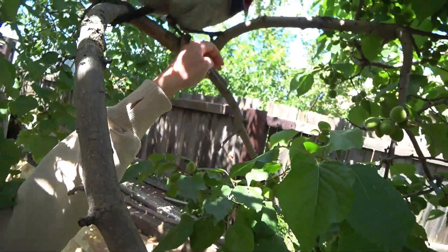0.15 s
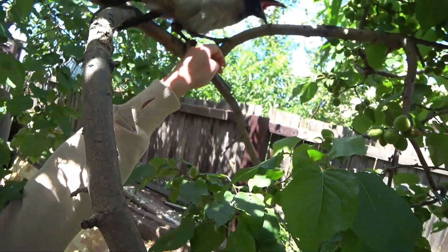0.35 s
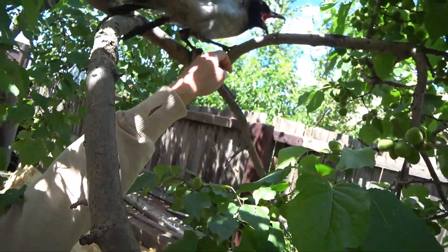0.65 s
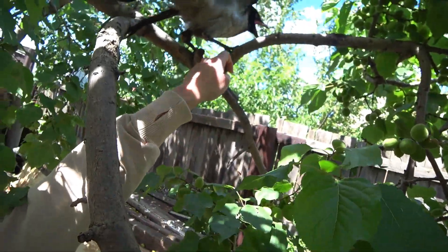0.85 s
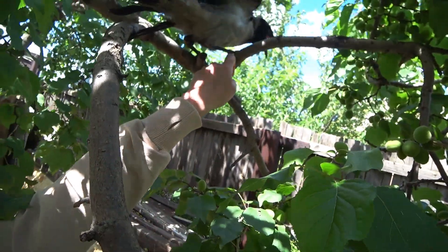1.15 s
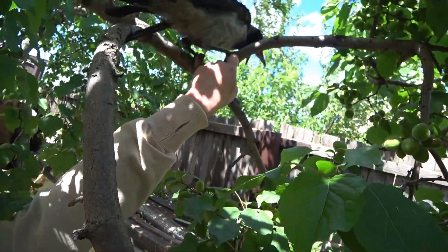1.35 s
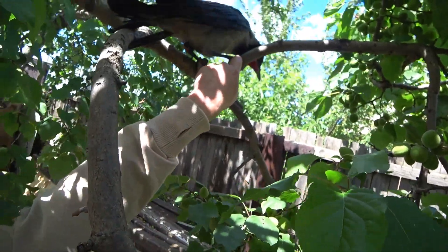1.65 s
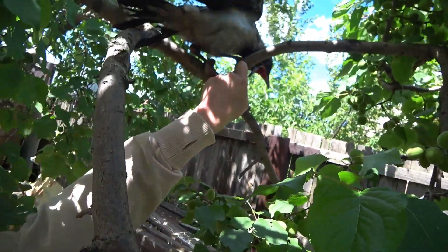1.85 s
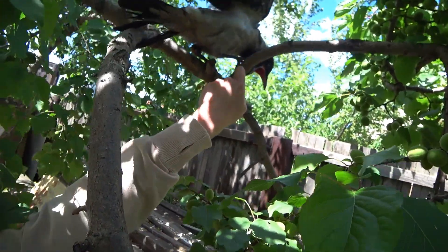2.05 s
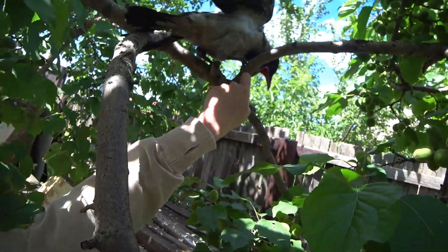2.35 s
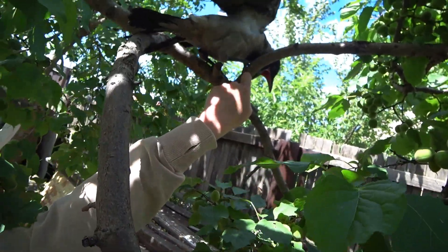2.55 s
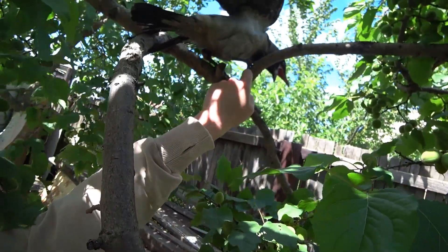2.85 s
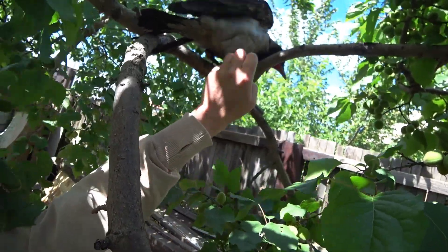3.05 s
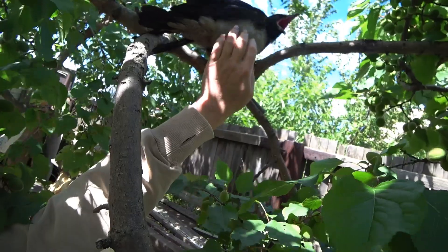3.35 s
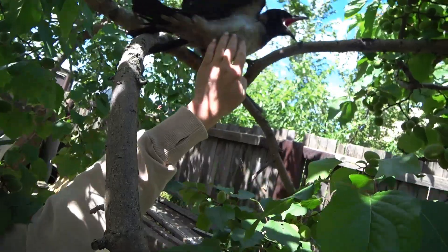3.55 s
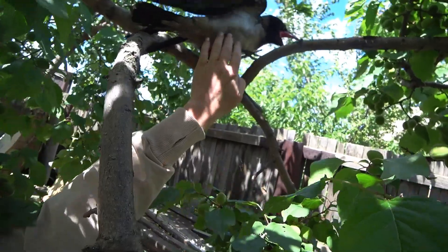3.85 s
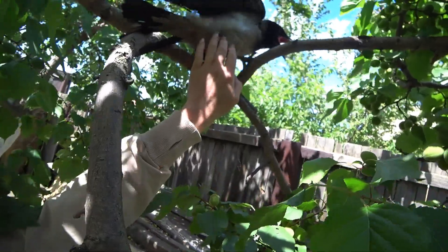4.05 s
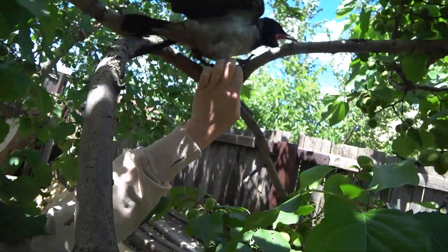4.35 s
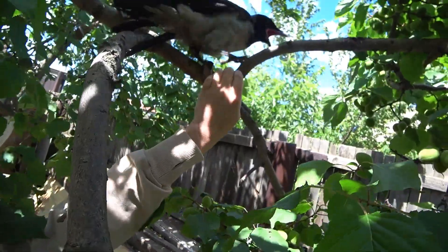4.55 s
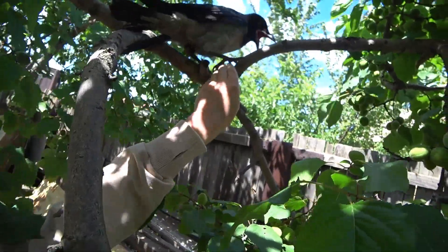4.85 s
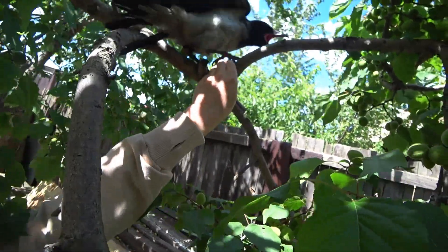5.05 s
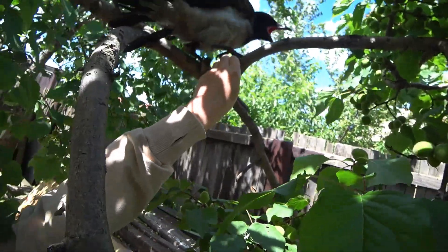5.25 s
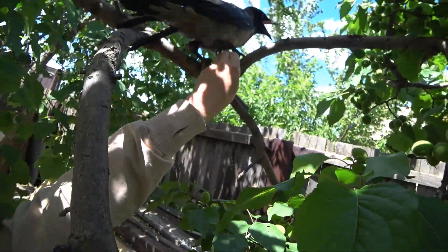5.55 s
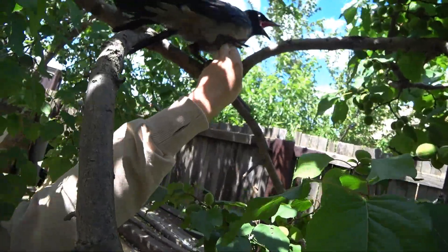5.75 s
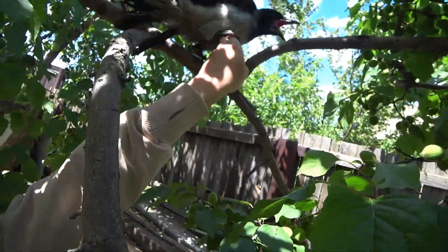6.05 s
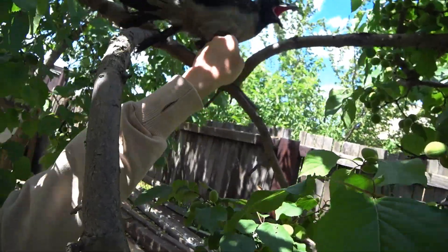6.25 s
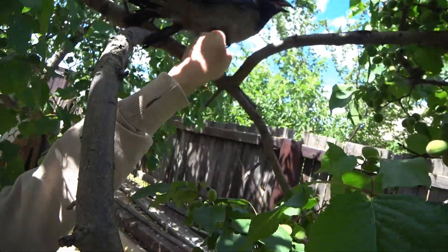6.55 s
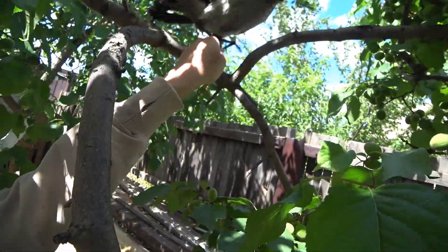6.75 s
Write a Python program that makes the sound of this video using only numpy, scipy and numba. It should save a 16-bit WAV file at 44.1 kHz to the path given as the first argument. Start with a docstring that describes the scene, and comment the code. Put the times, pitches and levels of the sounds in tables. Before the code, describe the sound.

A young crow caws eight times, close to the microphone and a little to the right, the short, raspy calls coming just under a second apart. Many brighten as the beak opens wider. Behind them is only the faint hush of a yard and distant town. Small claw ticks on a branch, light leaf rustles and a few soft low puffs on the microphone occur, mainly early on and after the final call.

```python
"""In a quiet leafy yard, a young crow begs eight times from a branch just above the microphone.
The two sides of its voice box snap at different rates, one about three quarters of the other,
and pull on each other, making the caw harsh.
Its throat rings with each snap, and the ringing tones mostly rise as the beak opens wider.
Leaves brush, claws tick on bark and air bumps the microphone, over a faint outdoor hush."""
import sys
import numpy as np
from scipy import signal
from scipy.fft import rfft, irfft
from scipy.io import wavfile
from scipy.ndimage import uniform_filter1d, minimum_filter1d
from numba import njit

SR = 44100
rng = np.random.default_rng(int(sys.argv[2]) if len(sys.argv) > 2 else 0)


def output_pcm(signal):
    """Save a mono or channel-first signal as 16-bit PCM at the path in sys.argv[1].

    Samples are clipped to [-1, 1] before scaling.
    """
    pcm = np.clip(np.atleast_2d(signal).T, -1, 1) * 32767
    wavfile.write(sys.argv[1], SR, np.round(pcm).astype(np.int16))


N = 304528
TIME = np.arange(N) / SR
YARD_FADE_S = .55  # time for the yard's echo to fall by 60 dB

# One caw per row. A pair holds the values before and after the beak opens wider.
# (start [s], end [s], attack [s], base pitch [Hz], pitch sag [share/s], time to half open [s],
# further time to fully open [s], level pair [dB], first, second and third throat tone pairs [Hz],
# brightness pair [dB], second tone gain [dB], top tone gain [dB])
CAW_SHAPES = [ (0.232, 0.625, 0.0042, 420.4, 0.18, .15, 0.081, -13, -5.5, 1980, 2130, 4270, 4680, 6870, 6550, 6, 2, -11.5, -7),
              (1.026, 1.422, 0.018, 409.6, .13, 0.19, 0.1, -6.5, -9, 1940, 2255, 3650, 5550, 6300, 6940, -2, 2.5, -10.5, -8),
              (1.835, 2.294, 0.0025, 404.6, 0.029, 0.17, 0.17, -9, -8.5, 2035, 2055, 4170, 4420, 6760, 6940, 1, 5.5, -11, 0.5),
              (2.636, 3.022, .009, 405.3, .01, .26, 0.13, -7.5, -7, 2000, 2110, 3680, 4420, 6450, 6400, -0.5, 4, -10, -1.5),
              (3.408, 3.825, 0.0042, 409.3, 0.068, 0.2, .09, -11, -5.5, 2040, 2010, 3840, 4300, 6400, 6370, 2, -1, -11.5, -3),
              (4.194, 4.597, 0.013, 409.4, .15, 0.15, 0.077, -6.5, -6.5, 1976, 2115, 3590, 4690, 6400, 6500, -3.5, 0, -11, -4.5),
              (5.039, 5.47, .004, 408.2, 0.064, 0.21, 0.14, -10.5, -7, 2060, 2060, 3660, 4520, 6620, 6300, 1.5, -1.5, -13.5, -9.5),
              (5.987, 6.384, 0.013, 399.8, 0.059, 0.18, 0.15, -7.5, -8, 1920, 2070, 3930, 4690, 6330, 6430, -3.5, 4.5, -10, -5),
              ]
# Tones at which the beak rings: (frequency [Hz], width [Hz], gain [dB])
BEAK_TONES = [(5750, 350, -20), (6230, 260, -14), (6920, 280, -15), (7600, 450, -17), (8250, 450, -17),
              (9100, 500, -24)]
# Tone colour of the voice at the microphone: (frequency [Hz], gain [dB])
VOICE_COLOUR = [(120, -28.5), (280, -1), (400, -2.5), (500, 1.5), (790, 0), (1100, 4), (1330, 1.5),
                (2100, 3.5), (3200, 0.5), (5200, 1), (9000, -3.5), (11000, -18.5)]
# How the bird's sound differs between the ears: (frequency [Hz], left minus right [dB])
BIRD_BALANCE = [(250, -2.5), (600, -1.5), (1300, -4), (2500, -5), (5500, -5), (10000, -5.5)]
# Claws and twigs on bark: (time [s], peak level [dB], ringing tone [Hz], fade time [s])
CLAW_TICKS = [(0.064, -39, 4950, 0.0065), (0.8437, -38.5, 4230, 0.035), (0.89, -37, 6330, 0.0055),
              (1.459, -37, 5200, .005), (1.499, -43, 4800, 0.0057), (1.6413, -39, 4700, 0.0052),
              (5.626, -41, 4200, 0.0075), (5.719, -43, 4600, 0.0068), (6.62, -27.5, 4700, 0.012),
              (6.667, -40.5, 3870, .007)]
# Leaves brushing: (time [s], level [dB], half length [s])
LEAF_BRUSHES = [(0.107, -57, 0.22), (6.73, -53, .012), (6.756, -52, 0.0093), (6.786, -42, 0.0082),
                (6.843, -52.5, 0.1)]
# Puffs of air and handling bumps: (time [s], level [dB], half length [s], frequency [Hz])
MIC_BUMPS = [(1.548, -38, 0.019, 65.3), (1.55, -50, 0.049, 248), (1.655, -47, 0.12, 52),
             (6.45, -39, 0.013, 33), (6.785, -42, 0.081, 34.3)]
# Tone colour of distant air and town: (frequency [Hz], relative level [dB])
AIR_COLOUR = [(13, -27), (22, 1), (143, -10), (241, -9.5), (274, -9), (394, -10.5), (498, -13), (838, -12),
              (1150, -13.5), (1300, -16.5), (1560, -18), (1830, -23), (2900, -23.5), (3900, -21.5),
              (11000, -30.5), (14300, -59), (22000, -120)]
# How wide the air sounds: (frequency [Hz], ear difference relative to the shared sound [dB])
AIR_SPREAD = [(40, -20), (150, -12.5), (500, -6.5), (2000, -5.5), (8000, -6)]
# Tone colour of the yard's echo: (frequency [Hz], gain [dB])
YARD_COLOUR = [(200, 7), (1000, -10), (2100, -4.5), (4000, -12), (6500, -12), (11000, -27)]


def undb(db):
    """Turn decibels into a number to multiply by."""
    return 10 ** (np.asarray(db) / 20)


def unit(x):
    """Scale a sound to an average (rms) strength of 1."""
    return x / np.sqrt(np.mean(x ** 2) + 1e-18)


def colour(x, points, share=1):
    """Shape bass and treble along a curve of (frequency [Hz], gain [dB]) points."""
    hz, db = np.transpose(points)
    size = 8192
    grid_hz = np.maximum(np.fft.rfftfreq(size, 1 / SR), 1)
    gain = undb(share * np.interp(np.log(grid_hz), np.log(hz), db))
    # build the filter so that it never rings before the sound arrives
    cepstrum = irfft(np.log(gain))
    cepstrum[1:size // 2] *= 2
    cepstrum[size // 2 + 1:] = 0
    return signal.fftconvolve(x, irfft(np.exp(rfft(cepstrum))))[:len(x)]


@njit
def band_pass(x, hz, width):
    """Let through a band of frequencies whose centre can move."""
    out, band, low = np.empty(len(x)), 0., 0.
    for i in range(len(x)):
        step, damping = np.tan(np.pi * hz[i] / SR), width[i] / hz[i]
        swing = (band + step * (x[i] - low)) / (1 + step * (step + damping))
        band, low = 2 * swing - band, low + 2 * step * swing
        out[i] = damping * swing
    return out


def resonate(x, hz, width):
    """Make a sound ring at one steady or moving tone; a smaller width [Hz] rings longer."""
    ones = np.ones(len(x))
    return band_pass(x + 1e-18, np.minimum(hz * ones, SR * .45), width * ones)


def wander(t, per_s):
    """A random drift, about 1 in size, that turns per_s times a second."""
    targets = rng.standard_normal(4096)
    return np.interp((t - t[0]) * per_s, np.arange(len(targets)), targets)


def swell(peak_s, half_s):
    """A bell-shaped rise and fall."""
    return np.exp(-.5 * ((TIME - peak_s) / half_s) ** 2)


def air():
    """Distant air and town make a gently swelling hush, its bass alike in both ears."""
    shared, side = (unit(colour(rng.standard_normal(N), AIR_COLOUR)) for _ in range(2))
    side = colour(side, AIR_SPREAD)
    level_db = -50.5 + .6 * wander(TIME, per_s=2.5)
    return np.array([shared + side, shared - side]) * undb(level_db)


def lingering_ring():
    """A fading band of noise at the start: the yard still rings from a caw just before."""
    hz, width = 2000, 800
    ring = [unit(resonate(resonate(noise, hz, width), hz, width))
            for noise in rng.standard_normal((2, N))]
    fade = undb(-60 * np.minimum(TIME / YARD_FADE_S, 2))
    return np.array(ring) * undb(-46) * fade


def leaves():
    """Leaves slide over each other with a dense, dry crackle."""
    crackle = rng.standard_normal(N) * undb(2.7 * wander(TIME, per_s=500))
    loudness = sum(undb(db) * swell(peak_s, half_s) for peak_s, db, half_s in LEAF_BRUSHES)
    return unit(resonate(crackle, hz=6400, width=7600)) * loudness


def claws():
    """Each short scratch of a claw makes a twig ring."""
    out, t = np.zeros(N), TIME[:SR // 10]
    for start_s, db, hz, fade_s in CLAW_TICKS:
        scratch = rng.standard_normal(len(t)) * np.exp(-t / fade_s)
        tick = resonate(scratch, hz, width=1800) + .76 * resonate(scratch, hz=6500, width=9000)
        start = int(start_s * SR)
        out[start:start + len(t)] += (undb(db) * tick / np.abs(tick).max())[:N - start]
    return out


def breath(age_s, left_s, attack_s):
    """Air pressure behind the voice box builds fast, fades as the air is spent, then stops."""
    attack = 1 - .87 * np.exp(-age_s / attack_s)
    release = 1 - np.exp(-(left_s / .026) ** 2)
    return attack * undb(-7.5 * age_s) * release


def pitch_arch(age_s, left_s, sag):
    """The share of the base pitch: it scoops up, sags slowly and drops at the end."""
    scoop = 1 - .22 * np.exp(-age_s / .02)
    drop = 1 - .31 * np.exp(-left_s / .052)
    return scoop * (1 - sag * age_s) * drop


def snaps(t, own_cycles, other_cycles, pull, squeeze_db, jitter_s, scatter_db):
    """One side of the voice box snaps once a cycle; the other side shifts its timing and strength."""
    when = np.interp(np.arange(np.ceil(own_cycles[0]), own_cycles[-1]), own_cycles, t)
    other_angle = 2 * np.pi * np.interp(when, t, other_cycles)
    chance = rng.standard_normal((512, 2))[:len(when)]
    when = when + pull * np.sin(other_angle) * np.gradient(when) + jitter_s * chance[:, 0]
    strength = undb(squeeze_db * np.cos(other_angle) + scatter_db * chance[:, 1])
    # a snap falls between samples, so spread it over the nearest eight
    place = np.maximum((when - t[0]) * SR, 4)[:, None]
    nearby = place.astype(int) + np.arange(-3, 5)
    shape = np.sinc(nearby - place) * np.sinc((nearby - place) / 4)
    return np.bincount(nearby.ravel(), (strength[:, None] * shape).ravel(), len(t))[:len(t)]


def voice_box(t, age_s, fast_hz):
    """Two sides snap at their own wavering rates; air hisses through the gap after each snap."""
    slow_hz = fast_hz * .745 * (1 - .06 * age_s)  # the slow side slackens a little sooner
    slow_hz *= 1 + .011 * wander(t, per_s=11)
    fast, slow = (np.cumsum(hz * (1 + .017 * wander(t, per_s=90))) / SR for hz in (fast_hz, slow_hz))
    fast, slow = fast - fast[0], slow + rng.random()
    pulses = snaps(t, fast, slow, pull=.0757, squeeze_db=-2, jitter_s=.00009, scatter_db=1.5)
    slow_pulses = snaps(t, slow, fast, pull=.036, squeeze_db=1.5, jitter_s=.00008, scatter_db=3.5)
    pulses += undb(-2.5) * slow_pulses
    closing_s = .0023
    gap = signal.lfilter([1], [1, -np.exp(-1 / (closing_s * SR))], np.abs(pulses))
    hiss = resonate(gap * rng.standard_normal(len(t)), hz=7800, width=20000)
    return unit(pulses) + undb(-7.5) * unit(hiss)


def throat(buzz, first_hz, second_hz, second_db):
    """The throat's two lower tones ring; a wider beak makes the second broader and louder."""
    gape = (second_hz / 4300) ** 1.1
    first = resonate(buzz, first_hz, width=410)
    second = gape * undb(second_db) * resonate(buzz, second_hz, width=gape * 475)
    return first + second + undb(-20.5) * buzz


def beak(t, buzz, second_hz):
    """The beak's tones glide up as it opens, and swell and fade as the head turns."""
    glide = (second_hz / second_hz.mean()) ** .12
    return sum(undb(db + 3.5 * wander(t, per_s=11.2)) * resonate(buzz, glide * hz, width)
               for hz, width, db in BEAK_TONES)


def twig_glints(t, voice):
    """Twigs and leaves by the head bounce the treble back; the delays slide as the head moves."""
    treble = signal.sosfiltfilt(signal.butter(3, 3000, "high", fs=SR, output="sos"), voice)
    delays_s = [rng.uniform(.001, .004) + .00003 * wander(t, per_s=6) for _ in range(3)]
    return voice + .26 * sum(np.interp(t - delay, t, treble, left=0) for delay in delays_s)


def caw(start_s, end_s, attack_s, pitch_hz, sag, half_open_s, opening_s, *tone_settings):
    """The voice box rings the throat and beak; opening the beak shifts tones, level and brightness."""
    *pairs, second_db, top_db = tone_settings
    t = TIME[(TIME >= start_s) & (TIME < end_s)]
    age_s, left_s = t - start_s, end_s - t
    opened = .5 + .5 * np.sin(np.pi / 2 * np.clip((age_s - half_open_s) / opening_s, -1, 1))
    level_db, first_hz, second_hz, third_hz, bright_db = (
        before + (after - before) * opened for before, after in zip(pairs[::2], pairs[1::2]))
    pressure = breath(age_s, left_s, attack_s)
    buzz = voice_box(t, age_s, pitch_hz * pitch_arch(age_s, left_s, sag))
    third = undb(-9.5) * resonate(buzz, third_hz, width=1080)
    top = undb(top_db) * resonate(buzz, hz=10530, width=1140)
    treble = third + beak(t, buzz, second_hz) + top
    voice = throat(buzz, first_hz, second_hz, second_db) + undb(bright_db) * pressure * treble
    # hollow out a dip on each side of the second tone, and one below the first
    for ratio in (.78, 1.23):
        voice = voice - .55 * resonate(voice, ratio * second_hz, width=153)
    voice = voice - .17 * resonate(voice, .718 * first_hz, width=420)
    voice = -colour(twig_glints(t, voice), VOICE_COLOUR)  # each snap is a drop in pressure
    return np.interp(TIME, t, unit(voice) * undb(level_db) * pressure, left=0, right=0)


def branch_echoes(x):
    """Branches around the microphone scatter very quick echoes, different at each ear."""
    t, fade_s = TIME[:SR // 50], .0062
    scatter = rng.standard_normal((2, len(t))) * t * np.exp(-t / fade_s)
    return undb(-12) * np.array([signal.fftconvolve(x, ear / np.linalg.norm(ear))[:N] for ear in scatter])


def yard_echo(x, gain_db, build_s):
    """Leaves and fence scatter the sound into a thin, fading tail."""
    t, ears = TIME[:SR], []
    for noise in rng.standard_normal((2, SR)):
        tail = noise * undb(-60 * t / YARD_FADE_S) * (1 - np.exp(-t / build_s))
        echo = undb(gain_db) * colour(tail / np.linalg.norm(tail), YARD_COLOUR)
        ears.append(signal.fftconvolve(x, echo)[:N])
    return np.array(ears)


def bumps():
    """Puffs of air and handling push on the microphone with low, soft thuds."""
    out = np.zeros(N)
    for peak_s, db, half_s, hz in MIC_BUMPS:
        shape = swell(peak_s, half_s)
        rumble = resonate(rng.standard_normal(N), hz, width=hz)
        puff = shape * resonate(rumble, hz, width=.48 * hz)
        out += undb(db) * puff * np.sqrt(np.sum(shape ** 2) / np.sum(puff ** 2))
    return out


def scene():
    """Mix the yard in stereo, with the bird close and a little to the right."""
    bird = sum(caw(*row) for row in CAW_SHAPES)
    direct = undb(-2.1) * np.array([colour(bird, BIRD_BALANCE, share) for share in (.5, -.5)])
    rustle = (claws() + leaves()) * undb([[-1.2], [1.2]])
    echoes = branch_echoes(bird) + yard_echo(bird + rustle.mean(axis=0), gain_db=-21, build_s=.0064)
    return direct + rustle + echoes + lingering_ring() + bumps() + air()


def record(dry):
    """The recorder turns everything down during loud calls, rounds spikes and cuts the top treble."""
    threshold_db, window_samples, ceiling, top_hz = -8, 700, .74, 11050
    peak = -minimum_filter1d(-np.abs(dry).max(axis=0), window_samples)
    gain = np.sqrt(np.minimum(undb(threshold_db) / (peak + 1e-9), 1))  # halves the excess decibels
    held = dry * uniform_filter1d(gain, window_samples // 2)
    rounded = held / (1 + (held / ceiling) ** 6) ** (1 / 6)
    return signal.sosfiltfilt(signal.ellip(10, .1, 60, top_hz, fs=SR, output="sos"), rounded)


dry = scene()
out = record(dry)
output_pcm(out)
```